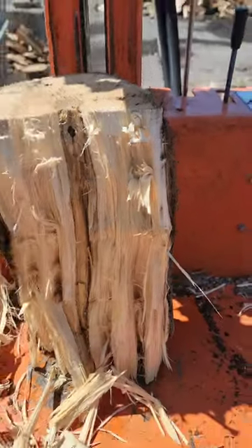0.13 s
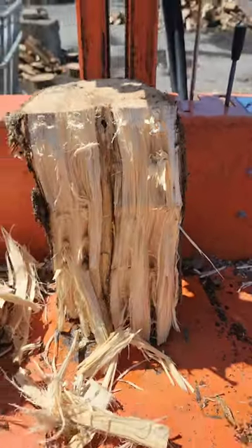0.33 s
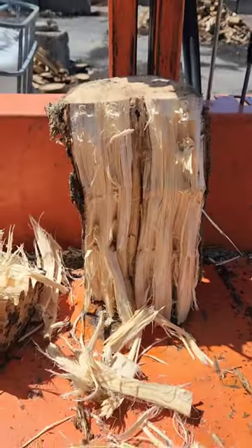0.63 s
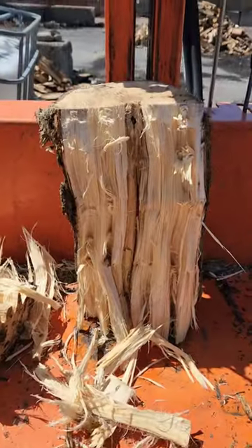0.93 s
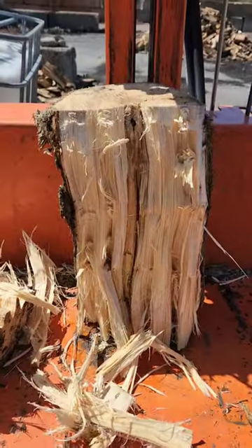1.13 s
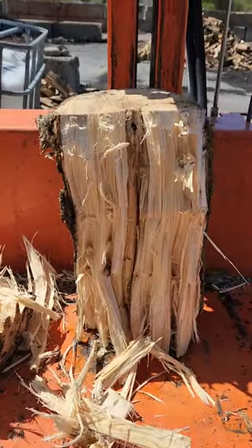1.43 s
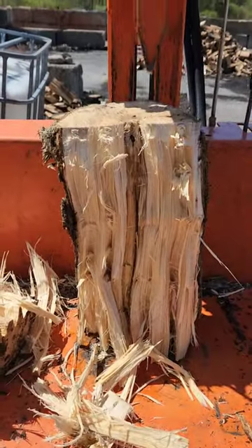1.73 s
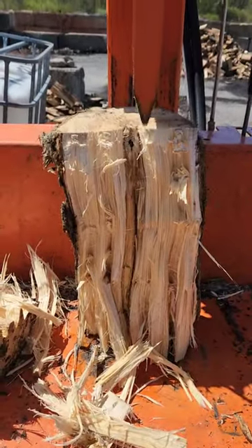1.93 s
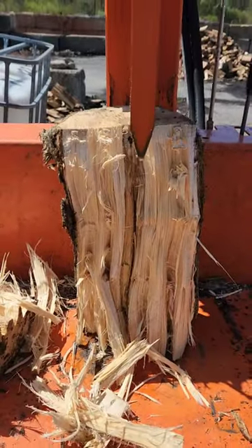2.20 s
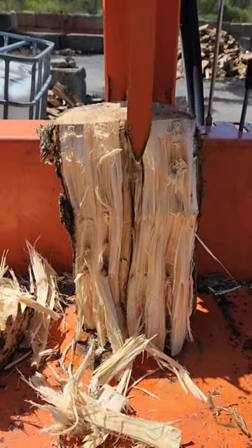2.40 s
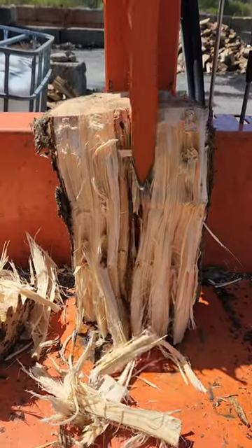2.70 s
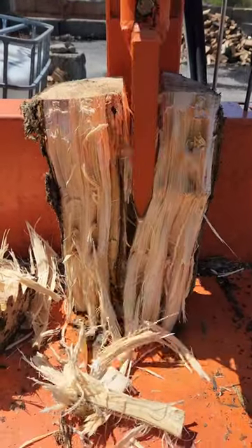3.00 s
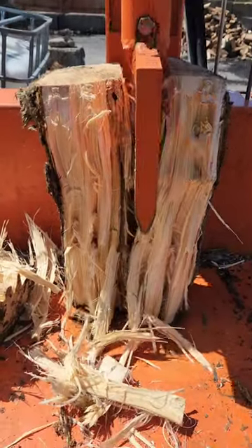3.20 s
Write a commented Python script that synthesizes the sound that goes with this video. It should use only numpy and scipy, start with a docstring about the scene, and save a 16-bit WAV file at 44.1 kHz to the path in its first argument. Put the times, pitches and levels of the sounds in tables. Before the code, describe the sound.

A petrol log splitter runs close by outdoors, its one-cylinder engine thudding fast and hissing beneath a steady pump whine. At about 1.4 s the ram clunks. At 2.2 s the wedge strikes wood with a thud and tiny steel ping; the engine sags, whine and hiss fading. Wood snaps at 2.55 s, bursts into dense cracks and knocks around 2.7-2.8 s, then sparser cracks until 3.2 s, with a short yard echo.

```python
"""A petrol log splitter runs outdoors, close by: a one-cylinder engine thuds and hisses while its gear pump whines.
The ram clunks on its way down, then the wedge bites with a ping; the engine sags under the load and the whine fades.
The wood crackles, bursts in a run of sharp cracks, and the parted halves knock on the steel bed.
Engine and pump tones are harmonics of one firing rate over coloured noise; knocks are blows sent through
resonances, cracks are noise bursts with a splinter ring, and a short noise tail answers from the yard."""
import sys
import numpy as np
from scipy import signal
from scipy.fft import rfft, irfft, next_fast_len
from scipy.io import wavfile
from scipy.ndimage import map_coordinates

SR = 44100
rng = np.random.default_rng(int(sys.argv[2]) if len(sys.argv) > 2 else 0)


def digitize_waveform(pressure):
    """Quantize a signal to 16-bit integers and store it at the path in sys.argv[1].

    Rows of a 2-D input are taken as channels; values are limited to [-1, 1].
    """
    field = np.atleast_2d(pressure).T
    bounded = np.clip(field, -1, 1)
    quanta = np.round(bounded * 32767).astype(np.int16)
    wavfile.write(sys.argv[1], SR, quanta)


N = 147735
T = np.arange(N) / SR

# engine speed: t/s, firing rate f/Hz
SPEED = [(0.0, 29.98), (0.45, 30.19), (1.0, 30.2), (1.4, 30.27), (1.75, 30.39), (2.15, 30.37), (2.4, 29.49),
         (2.7, 29.34), (2.95, 29.86), (3.35, 29.31)]


def shaft():
    """Firing cycles turned so far: the running sum of the engine speed."""
    return np.cumsum(curve(SPEED)) / SR


MUFFLER_HZ, MUFFLER_WIDTH_HZ = 72, 150  # the silencer delays the pulse around this frequency
EXHAUST_TURN, HISS_TURN = 0, 0.53  # places in the firing cycle (0-1)


def exhaust(turns, orders, flutter):
    """One pulse per firing, smeared by the silencer's phase shift; its harmonics are slightly unsteady."""
    k, db = np.transpose(orders)
    grid = np.arange(257)  # multiples of the firing rate
    hz = grid * np.mean(curve(SPEED))
    pole = MUFFLER_HZ ** 2 - hz ** 2 + 1j * hz * MUFFLER_WIDTH_HZ
    silencer = np.conj(pole) / pole  # all-pass: alters phase, not level
    shape = causal(amp(np.interp(grid, k, db))) * silencer
    tone = 0
    for i in range(1, len(k) + 1):
        unsteady = 1 + flutter * np.sqrt(i) * (wobble(9) + 1j * wobble(9))
        tone = tone + np.real(shape[i] * unsteady * np.exp(2j * np.pi * i * (turns - EXHAUST_TURN)))
    return unit(tone)


# exhaust harmonics, running free and under load: multiple of the firing rate, relative level/dB
FREE_ORDERS = [(1, -11.5), (2, 1), (3, -7.5), (4, 2.5), (5, -13.5), (6, -4.5), (7, -24), (8, -11.5),
               (9, -11.5), (10, -10), (11, -27.5), (12, -26.5), (13, -19)]
LOADED_ORDERS = [(1, -18), (2, 1), (3, 0), (4, -8), (5, -16.5), (6, -6), (7, -9.5), (8, -12), (9, -14),
                 (10, -13.5), (11, -23), (12, -20), (13, -15.5)]
# exhaust: t/s, level/dB
EXHAUST_DB = [(0, -16.5), (1.35, -15.5), (1.55, -17), (2.15, -17), (2.35, -19.5), (2.8, -21), (3.35, -20)]
# rough part of the engine's drone: t/s, level/dB
DRONE_DB = [(0, -22), (1.4, -23), (2.2, -25.5), (2.4, -28.5), (3.35, -29.5)]
# drone colour: f/Hz, relative level/dB
DRONE = [(15, -12), (28, -2), (42, 5), (80, 1.5), (200, -0.5), (350, -3), (440, -11), (560, -7.5),
         (850, -6.5), (1100, -9.5), (1500, -12), (1900, -19), (2800, -30.5)]
# engine hiss and clatter: t/s, level/dB
HISS_DB = [(0, -26.5), (1.3, -26), (1.6, -30), (2.2, -27.5), (2.35, -32), (2.9, -33.5), (3.35, -33)]
# hiss colour: f/Hz, relative level/dB
HISS = [(900, -32), (1300, -10), (1750, -8), (1950, -9), (2200, -6), (2700, -11.5), (3800, -13),
        (5000, -11), (7400, -9.5), (9500, -21), (11500, -17.5), (13200, -16.5), (15700, -29)]
# stereo balance of drone and hiss: f/Hz, left-right level/dB
LEAN = [(200, -1.4), (700, 0.7), (1500, 0.71), (2500, 1), (5000, -3.8), (8000, -3.1), (14000, -0.27)]
LOAD_S, LOAD_RISE_S = 2.19, 0.147  # when the wedge takes the load, and how fast
LOAD_DULL_HZ, LOAD_DULL_DB = 2540, -3.5  # under load the hiss loses its middle


def engine(turns):
    """Exhaust pulses that change tone under load, with drone and hiss that swell once a cycle."""
    load = np.clip((T - LOAD_S) / LOAD_RISE_S, 0, 1)
    free_pipe = exhaust(turns, FREE_ORDERS, flutter=0.038)
    loaded_pipe = exhaust(turns, LOADED_ORDERS, flutter=0.058)
    pipe = (1 - load) * free_pipe + load * loaded_pipe

    swell = lambda place, depth_db: amp(depth_db * np.cos(2 * np.pi * (turns - place)))
    rumble = rng.standard_normal((2, N)) * swell(EXHAUST_TURN, depth_db=0.4)
    drone = unit(spread(coloured(rumble, DRONE)))
    puffs = grit(grain_db=1.5, rate=700) * swell(HISS_TURN, depth_db=2.5)
    hiss = unit(spread(coloured(puffs, HISS)))
    dip = lambda hz: amp(LOAD_DULL_DB * np.exp(-np.log2((hz + 1) / LOAD_DULL_HZ) ** 2))
    dull = filtered(hiss, dip)
    hiss_gain = amp(curve(HISS_DB) + 0.72 * wobble(14))
    rough = amp(curve(DRONE_DB)) * drone + hiss_gain * ((1 - load) * hiss + load * dull)
    return amp(curve(EXHAUST_DB)) * pipe + filtered(rough, lambda hz: pan(along(LEAN, hz)))


# ringing of the engine casing: t/s, level/dB
CASING_DB = [(0, -29), (.7, -28), (1.35, -26.5), (1.6, -31.5), (2.15, -30), (2.35, -39.5), (3.35, -42)]
# casing harmonics: multiple of the firing rate, relative level/dB
CASING = [(16, -4.5), (17, -10), (18, -9), (21, -8), (22, -11), (23, -2.5), (25, -7), (27, -7.5), (28, -14),
          (29, -13.5), (36, -15)]


def casing(turns):
    """The engine's shell rings on the firing harmonics."""
    ring = sum(amp(db) * partial(turns, order, flutter_db=2.0, drift=0.42) for order, db in CASING)
    return amp(curve(CASING_DB)) * pan(db=3.5) * ring


# pump whine: t/s, level/dB
WHINE_DB = [(0, -27.5), (.3, -28.5), (.5, -30), (.9, -30.5), (1.2, -29), (1.55, -28), (2, -29),
            (2.2, -32.5), (2.4, -48.5), (3.35, -39.5)]
# gear-tooth tones: multiple of the firing rate (rounded when played), relative level/dB,
# left-right level/dB, flutter level/dB
WHINE = [(24, 0, 2.5, 1.75), (48, -2, 11.5, 1.15), (71.5, -11.5, 13.5, 3.5)]
# fuzzy oil-flow tone beside the top tooth tone: multiple of the mean firing rate, level, width
FLOW_ORDER, FLOW_DB, FLOW_WIDTH_HZ = 73, -9.5, 110


def pump(turns):
    """Gear teeth meshing in step with the engine, and a fuzzy tone from the flutter of the oil flow."""
    teeth = 0
    for order, db, lean_db, flutter_db in WHINE:
        teeth = teeth + amp(db) * pan(lean_db) * partial(turns, order, flutter_db, drift=0.76)
    flow = amp(FLOW_DB) * band(FLOW_ORDER * np.mean(curve(SPEED)), FLOW_WIDTH_HZ)
    return amp(curve(WHINE_DB)) * (teeth + flow)


# resonances of log and steel bed: f/Hz, width f/Hz, relative level/dB
BODY = [(363, 49, -0.5), (543, 76, 3), (700, 83, -1.5), (848, 105, 1), (1073, 81, -2), (1415, 127, -1),
        (1610, 68, -3.5), (1776, 110, -3.5), (2100, 67, -9.5)]
FOCUS_OCTAVES = 1.13  # how widely a blow spreads over the resonances


def bed(f, focus_hz):
    """Resonances of log and steel bed, strongest around focus_hz, alternating in sign."""
    h = 0
    for k, (centre, width, db) in enumerate(BODY):
        focus = np.exp(-(np.log2(centre / focus_hz) / FOCUS_OCTAVES) ** 2)
        resonance = 1j * f * width / (centre * centre - f * f + 1j * f * width)
        h = h + (-1) ** k * amp(db) * focus * resonance
    return h / np.sqrt(np.mean(abs(h) ** 2))


# heavy knocks: t/s, thud level/dB, grinding level/dB, strongest f/Hz, boom level/dB, scrape level/dB,
# rise time constant t/s, decay t/s to -60 dB (its sign is ignored)
KNOCKS = [(1.428, 7, -18.5, 2100, -27, -16.5, 0.0257, 0.2), (1.446, 13, -14.5, 493, -18, -29, 0.0086, 0.13),
          (2.202, 14.5, -14, 610, -25, -29, 0.0022, 0.1), (2.224, 9, -10, 1240, -24, -24, 0.01, 0.05),
          (2.25, 4, -19, 900, -21.5, -23, 0.011, .13), (2.554, 5.5, -18.5, 910, -32.5, -31, 0.0034, 0.43),
          (2.714, 2, -23, 700, -31, -35, 0.011, -0.3), (2.781, 7, -18, 950, -30, -34, .003, 0.11),
          (2.809, 8.5, -17, 860, -22.5, -39, 0.0026, 0.02), (3.038, 3, -26, 930, -32, -43, .002, 0.14),
          (3.135, 7, -14, 1230, -24, -21.5, 0.0169, 0.17), (3.169, -4, -24, 990, -25, -31.5, 0.012, .16)]
# boom of the frame: f/Hz, relative level/dB
BOOM = [(120, -22.5), (210, -6), (310, 5), (380, 2.5), (480, -22.5), (900, -52)]
BOOM_DECAY_S = .42  # to -60 dB


def knocks():
    """Each blow of ram or log is a thud inside a grinding stroke: bed rings, frame booms, surfaces scrape."""
    grind, body, boom, scrape = grit(grain_db=3.5, rate=660), 0, 0, 0
    for s, thud_db, grind_db, focus_hz, boom_db, scrape_db, rise, decay in KNOCKS:
        blow = burst(s, rise, decay)
        thud = amp(thud_db) * (np.arange(N) == round(s * SR))  # a single-sample click
        strike = amp(grind_db) * blow * grind + np.array([thud, 0 * thud])
        body = body + filtered(strike, lambda f: bed(f, focus_hz))
        boom = boom + amp(boom_db) * burst(s, rise, BOOM_DECAY_S)
        scrape = scrape + amp(scrape_db) * blow
    frame = coloured(boom * grit(grain_db=2.5, rate=220), BOOM)
    surfaces = coloured(scrape * grit(grain_db=2.0, rate=900), FIBRE)
    return spread(body + frame + surfaces)


BITE_S = 2.2005  # the wedge pings as it bites
# steel ping of the wedge: f/Hz, level/dB, decay t/s to -60 dB
WEDGE = [(4890, -6, 0.038), (6660, -20, 0.091), (7300, -29, .06)]


def wedge():
    """A short steel ping as the edge enters the wood: decaying sines with jittered phase."""
    t = np.maximum(T - BITE_S, 0)
    ping = 0
    for hz, db, t60 in WEDGE:
        ping = ping + amp(db - 60 * t / t60) * np.sin(2 * np.pi * hz * t + .5 * wobble(500))
    return pan(db=-4) * ping * (1 - np.exp(-t / 0.00075))  # soft onset


# wood cracks: t/s, level/dB, decay t/s to -60 dB (its sign is ignored), splinter's ring f/Hz,
# left-right level/dB
CRACKS = [(2.43, -26, 0.19, 6500, 10), (2.536, -29, .04, 5200, 0), (2.548, -8.5, 0.0548, 5200, -1.5),
          (2.5532, -12, 0.05, 6500, 2), (2.679, -9.5, .035, 5000, -1.5), (2.703, -22, -0.18, 6000, 4),
          (2.7126, -11.5, -0.0743, 4270, -3), (2.717, -26, .018, 5000, 6), (2.7337, -9.5, 0.0045, 6300, -5),
          (2.7436, -9, 0.04, 2250, -5), (2.757, -12, 0.04, 7600, -4), (2.773, -6.5, .028, 6300, 2),
          (2.7814, -12, 0.04, 5500, -4), (2.8066, -6.5, -0.0042, 7000, 3), (2.8205, -19, .012, 4500, -1),
          (2.8486, -20.5, -0.1, 6300, -4), (2.901, -25.5, 0.1, 10500, 0), (2.974, -19, 0.08, 5800, 0),
          (3.035, -13, 0.0654, 5300, -1), (3.191, -14.5, 0.1, 6500, 0)]
# colour of snapping, tearing and scraping fibre: f/Hz, relative level/dB
FIBRE = [(300, -10), (900, -1.5), (2000, -4), (3200, -7), (5000, -2), (7300, 0), (9500, -13), (12500, -8),
         (16000, -14)]
# tearing of small fibres: t/s, level/dB
TEARING_DB = [(2.2, -43), (2.3, -43), (2.52, -34), (2.57, -28), (2.64, -28.5), (2.7, -25.5), (2.76, -38),
              (2.82, -34), (2.88, -49), (3.35, -42)]
SPLINTER_DB, SPLINTER_WIDTH_HZ, SNAP_DB = -6, 1200, -3  # the ring and the broad snap of a crack


def splitting():
    """Bundles of fibres snap, each splinter ringing briefly, over a bed of fine tearing."""
    snap = amp(SNAP_DB) * spread(coloured(grit(grain_db=4.0, rate=1800), FIBRE))
    blur = np.array([wobble(SPLINTER_WIDTH_HZ) + 1j * wobble(SPLINTER_WIDTH_HZ) for _ in range(2)])
    cracks = 0
    for s, db, decay, hz, lean_db in CRACKS:
        splinter = amp(SPLINTER_DB) * np.real(blur * np.exp(2j * np.pi * hz * T))
        envelope = burst(s, rise_s=0.00028, decay_s=decay)
        cracks = cracks + amp(db) * pan(lean_db) * envelope * (snap + splinter)
    tearing = amp(curve(TEARING_DB)) * (T > BITE_S) * grit(grain_db=3.5, rate=640)
    return cracks + pan(db=-4) * spread(coloured(tearing, FIBRE))


# decay of the yard's answer: f/Hz, decay t/s to -60 dB
YARD = [(200, 0.34), (2000, 0.17), (10000, 0.086)]
YARD_DB = -22


def yard(x):
    """A short answer from the walls and woodpiles around: noise that dies sooner in the treble."""
    hz, t, z = signal.stft(rng.standard_normal((2, SR // 2)), SR, nperseg=256)
    fading = z * amp(-60 * t / along(YARD, hz)[:, None])
    tail = signal.istft(fading, SR, nperseg=256)[1]
    return signal.fftconvolve(x, tail / np.linalg.norm(tail[0]), axes=1)[:, :N]


def partial(turns, order, flutter_db, drift):
    """One multiple of the firing rate, reaching each ear with its own wavering phase."""
    phase = drift * np.array([wobble(14), wobble(14)]) + rng.uniform(0, 2 * np.pi)
    return unit(amp(flutter_db * wobble(18)) * np.sin(2 * np.pi * round(order) * turns + phase))


def band(hz, width_hz):
    """Narrow noise around hz, unrelated between the ears."""
    carrier = np.exp(2j * np.pi * hz * T)
    return np.array([np.real((wobble(width_hz) + 1j * wobble(width_hz)) * carrier) for _ in range(2)])


def grit(grain_db, rate):
    """Two white noises broken into grains of random size."""
    return unit(rng.standard_normal((2, N)) * amp(grain_db * np.clip(wobble(rate), -2, 2)))


def burst(s, rise_s, decay_s):
    """An envelope that swells up to time s and dies away."""
    swell = np.exp(np.minimum(T - s, 0) / abs(rise_s))
    return swell * amp(-60 * np.maximum(T - s, 0) / abs(decay_s))


# left-right likeness: f/Hz, correlation (-1 to 1)
ALIKE = [(100, .95), (250, 0.66), (500, .6), (1000, -0.17), (2500, 0.07), (12000, 0)]


def spread(pair):
    """Two unrelated signals as a stereo pair, alike in the bass."""
    turn = lambda hz: np.arccos(np.clip(along(ALIKE, hz), -1, 1)) / 2
    mid, side = filtered(pair, lambda hz: np.array([np.cos(turn(hz)), np.sin(turn(hz))]))
    return np.array([mid + side, mid - side])


def pan(db):
    """Left and right gains for a level difference."""
    return amp(np.array([[.5], [-.5]]) * db)


def coloured(x, spectrum):
    """x through a causal colour that keeps the power of white noise."""
    return filtered(x, lambda hz: causal(unit(amp(along(spectrum, hz)))))


def causal(gain):
    """The minimum-phase response with these gains."""
    c = irfft(np.log(np.maximum(gain, 1e-6)))
    half = len(c) // 2
    c[1:half] *= 2
    c[half + 1:] = 0
    return np.exp(rfft(c))


def filtered(x, response):
    """x times a response of frequency."""
    m = next_fast_len(N + SR // 2)
    return irfft(rfft(x, m) * response(np.fft.rfftfreq(m, 1 / SR)), m)[..., :N]


def wobble(rate):
    """A smooth random curve, rate knots a second."""
    return map_coordinates(rng.standard_normal(int(N * rate / SR) + 4), [T * rate])


def curve(points):
    """(s, value) points as one value per sample."""
    return np.interp(T, *np.transpose(points))


def along(points, hz):
    """(Hz, value) points on a log axis."""
    f, v = np.transpose(points)
    return np.interp(np.log(hz + 1), np.log(f + 1), v)


def amp(db):
    """Decibels to a linear gain."""
    return 10 ** (np.asarray(db) / 20)


def unit(x):
    """x scaled to an RMS of one."""
    return x / np.sqrt(np.mean(x ** 2) + 1e-20)


def scene():
    """Engine and pump share one shaft; the log sounds in the yard."""
    turns = shaft()
    log = knocks() + wedge() + splitting()
    return engine(turns) + casing(turns) + pump(turns) + log + amp(YARD_DB) * yard(log)


TOP_HZ = 15750  # band limit


def record(dry):
    """Peaks are rounded off near full scale; nothing is kept above the band limit."""
    held = dry / (1 + np.abs(dry) ** 6) ** (1 / 6)
    return filtered(held, lambda hz: hz < TOP_HZ)


dry = scene()
out = record(dry)
digitize_waveform(out)
```